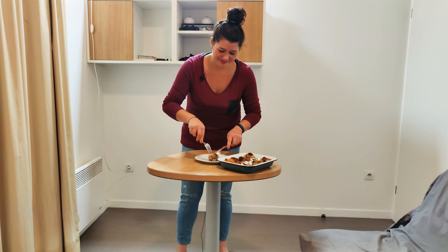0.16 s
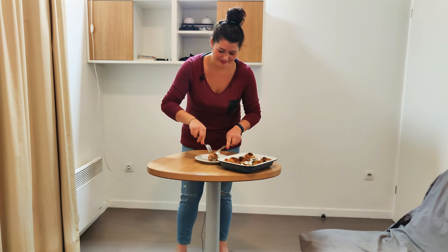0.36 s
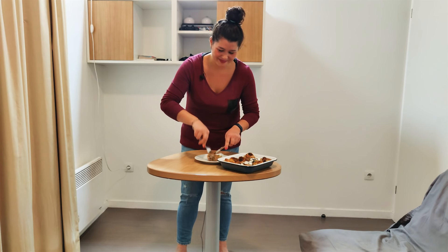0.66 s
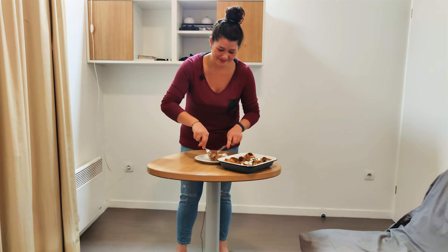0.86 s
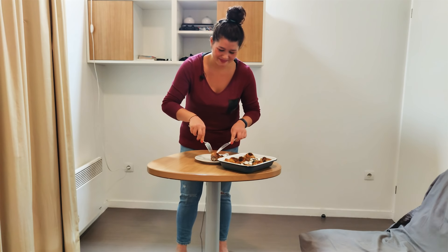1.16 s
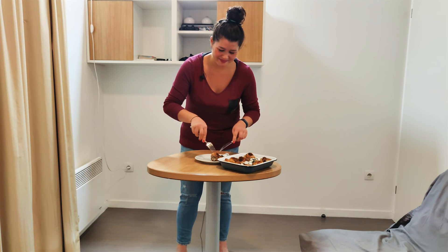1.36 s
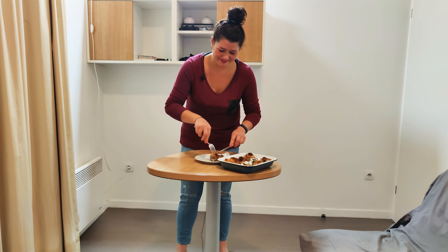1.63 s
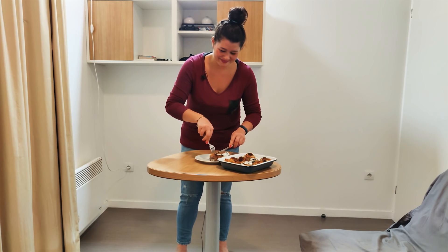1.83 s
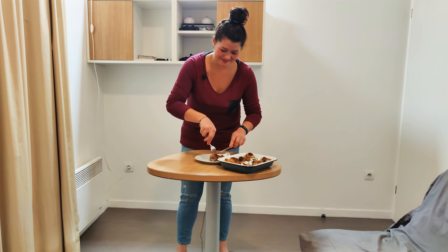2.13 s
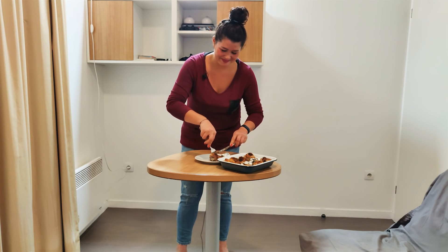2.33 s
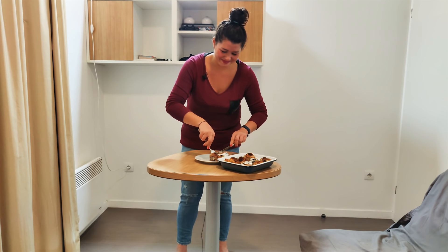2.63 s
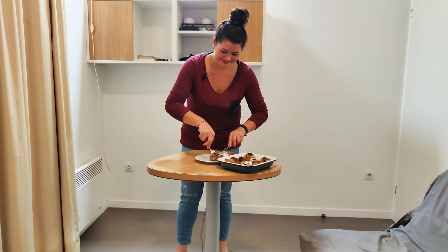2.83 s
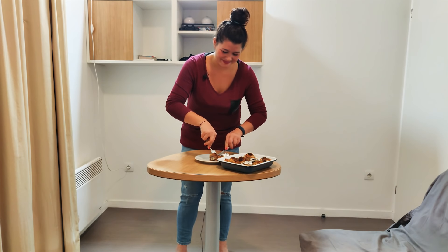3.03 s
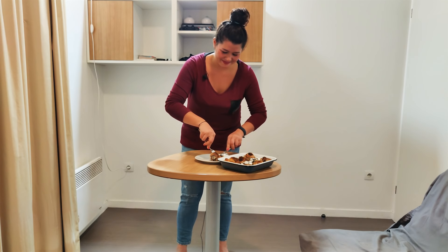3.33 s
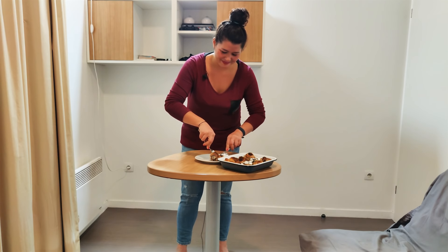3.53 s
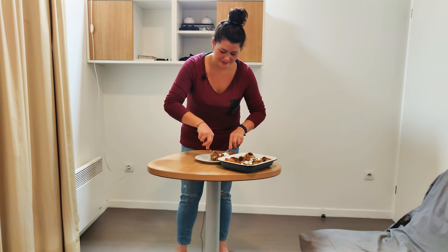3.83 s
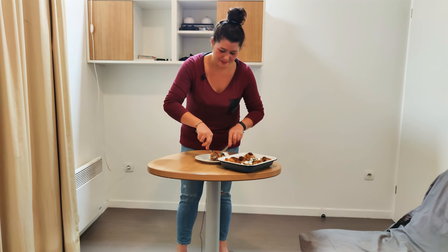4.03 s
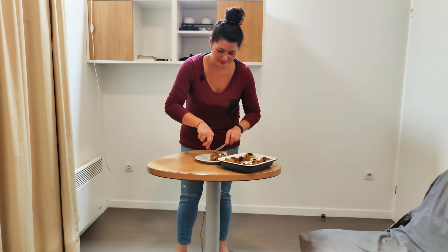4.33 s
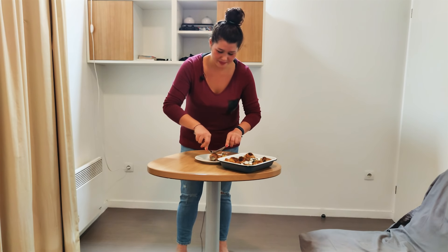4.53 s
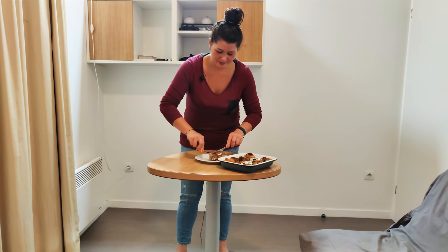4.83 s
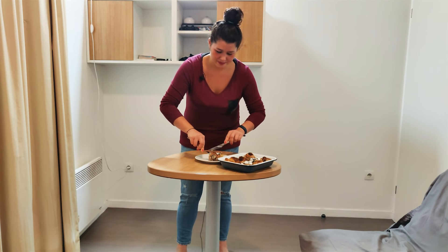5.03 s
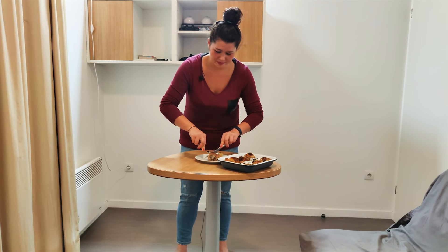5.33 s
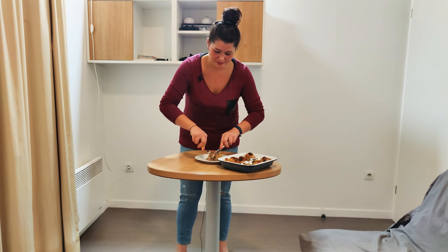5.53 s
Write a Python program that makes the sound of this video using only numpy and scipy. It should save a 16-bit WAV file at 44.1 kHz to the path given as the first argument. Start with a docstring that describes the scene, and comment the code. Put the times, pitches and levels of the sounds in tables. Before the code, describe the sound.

One sharp fork clink on a plate opens the scene, steel and ceramic ringing together and fading. After a pause, meat is cut in irregular strokes: light tearing crackle, thin blade squeaks, rasps on glaze, and damped knocks on the pressed plate, strongest mid-way and near the end. The microphone picks up a hard-walled small room, subtle table reflection, low rumble and faint air noise.

```python
"""A fork clinks hard on a ceramic plate and both ring, in a small, bare room with a low rumble.
Then cooked meat is cut on that plate, on a wooden table: the knife taps, saws through crackling meat,
knocks on the pressed plate and judders over its glaze. Steel and plate ring as damped resonances; slips and
tearing fibres are coloured impulses. Walls and table top answer plate and cutlery; small ticks stay dry."""
import sys
import numpy as np
from scipy import signal
from scipy.fft import rfft, irfft
from scipy.io import wavfile
from scipy.ndimage import uniform_filter1d

SR = 44100
rng = np.random.default_rng(int(sys.argv[2]) if len(sys.argv) > 2 else 0)


def store_pcm(level_fs):
    """Save levels as 16-bit WAV."""
    pcm = np.round(np.clip(level_fs, -1, 1) * 32767).astype(np.int16)
    wavfile.write(sys.argv[1], SR, np.atleast_2d(pcm).T)


N = 250929
TIME = np.arange(N) / SR

# Colour of the room air. Each row: frequency in Hz, relative level in dB per Hz.
AIR_COLOUR = [(15, 0), (30, -2), (55, -6), (85, -23), (200, -20), (430, -29), (850, -32), (1700, -36),
              (4400, -41), (6800, -40), (9200, -30), (12000, -40), (16000, -45)]
# Decay of the bare room. Each row: frequency in Hz, t60 in seconds.
ROOM_DECAY = [(125, 0.45), (500, 0.52), (2500, 0.47), (8000, .5), (15000, 0.22)]
# Small dry ticks close by. Each row: start in seconds, peak in dB.
CLOSE_TICKS = [(0.875, -35.5), (0.882, -26.5), (1.7684, -23.5), (2.8148, -17.5)]
# Thin squeaks of the sliding blade, one curve each. Each row of a curve: time in seconds, pitch in Hz, level in dB.
SQUEAK_CURVES = [
    [(2.32, 5630, -76), (2.398, 6400, -65), (2.45, 6300, -67), (2.502, 6600, -64), (2.576, 6900, -67),
     (2.64, 7220, -67)],
    [(2.72, 6330, -73), (2.765, 6400, -69), (2.82, 6100, -72)],
]
# The edge catches and rasps on the glaze.
# Each row: start in seconds, length in seconds, pitch in Hz, width in Hz, level in dB.
EDGE_RASPS = [(0.384, 0.036, 9100, 2510, -38), (0.625, 0.039, 8500, 1840, -37.5),
              (0.663, 0.02, 2970, 3000, -38), (0.687, 0.022, 9500, 600, -40),
              (0.763, 0.029, 4050, 1800, -51), (0.871, 0.023, 3320, 1500, -52.5),
              (2.037, 0.031, 9450, 1800, -49), (3.168, 0.026, 6200, 450, -51),
              (3.202, 0.02, 6250, 500, -35.5), (3.239, 0.049, 760, 67.5, -29.5),
              (3.632, 0.018, 4440, 900, -58), (3.683, 0.061, 3060, 350, -58), (3.703, 0.02, 2300, 300, -44),
              (4.397, 0.071, 2290, 380, -45.5), (4.445, 0.018, 5500, 250, -53),
              (4.547, 0.082, 3600, 700, -51), (4.55, 0.088, 9560, 1150, -42.5),
              (4.833, 0.04, 4900, 970, -58.5), (4.868, 0.062, 4720, 895, -54),
              (5.002, 0.045, 2210, 690, -38), (5.244, 0.055, 1080, 300, -50.5)]
# The loudest snaps of fibre and crust under the blade.
# Each row: start in seconds, peak in dB, treble tilt in dB per octave.
CRUST_SNAPS = [(0.7773, -25.5, -1), (1.6468, -34, 14), (1.761, -35.5, 1), (1.893, -33, 0), (1.935, -35, 11),
               (1.9753, -32.5, 7), (2.0376, -22.5, 3.5), (2.07, -32, 5), (2.617, -26, 6),
               (3.37, -16.5, -2.5), (3.396, -23, -3), (3.616, -30, 7), (3.6621, -24.5, -1),
               (3.9738, -27.5, -3.5), (4.1914, -24, 1), (4.55, -32, 11), (4.5995, -22.5, 18),
               (4.6607, -29.5, 2.5), (4.9567, -33, 0.5), (5.354, -29, 2), (5.66, -38.5, 10.5)]
# The point of the blade skips on the glaze. Each row: start in seconds, peak in dB.
POINT_SKIPS = [(4.339, -30.5), (4.3919, -25), (4.398, -19), (4.4022, -23), (4.415, -26), (4.8365, -41),
               (4.852, -38)]
# Colour of tearing meat. Each row: frequency in Hz, relative level in dB per Hz.
MEAT_COLOUR = [(200, -9.5), (1400, -12.5), (2600, -13), (4500, -12.5), (6500, -18), (8500, -7),
               (9600, -7.5), (11500, -13.5), (15500, -27.5)]
# Colour of steel grinding on glaze. Each row: frequency in Hz, relative level in dB per Hz.
GLAZE_COLOUR = [(250, -8.5), (700, -6), (1300, -6.5), (2300, -3.5), (3100, -7), (4600, 4.5), (5600, -6),
                (6700, -16), (9500, -2), (15000, -17.5)]
# Strokes of the cutlery through meat and over glaze. Each row: start in seconds, length in seconds,
# plate body in dB, plate edge in dB, meat crackle in dB, swell from start to end in dB.
CUTLERY_STROKES = [ (0.374, 0.015, -40.5, -47.5, -59.5, 11), (1.596, 0.055, -73, -80, -64.5, -6.5),
                   (1.925, 0.13, -70.5, -66, -55.5, 2), (2.3, 0.21, -65.5, -79.5, -70.5, -3),
                   (2.521, 0.18, -61, -75, -58.5, -5), (2.66, 0.053, -53.5, -59, -57.5, -5),
                   (2.817, 0.23, -65, -67, -59, -2), (2.989, 0.066, -55, -60, -49, -2),
                   (3.026, 0.05, -34, -60, -51, 3), (3.175, 0.055, -38.5, -41.5, -41, 11),
                   (3.241, 0.051, -48.5, -42, -39.5, 18), (3.322, 0.025, -66, -70, -45.5, -10),
                   (3.495, 0.062, -52, -54.5, -50.5, -4.5), (3.622, 0.11, -77, -60, -50, -7),
                   (3.706, 0.04, -81, -55.5, -49.5, -7.5), (3.971, 0.21, -63, -58, -50.5, -3),
                   (4.188, 0.11, -69, -68, -55, -11), (4.375, 0.09, -51.5, -64, -57.5, 3),
                   (4.536, 0.061, -77, -58, -47, 3.5), (4.825, 0.076, -67, -62, -60.5, 19.5),
                   (4.993, 0.039, -38.5, -43, -40.5, 1.5), (5.223, 0.14, -45.5, -52, -59, -2.5),
                   (5.624, 0.026, -65.5, -67.5, -71, -3.5), ]
# Blade knocks on the pressed plate. Each row: start in seconds, level in dB, treble tilt in dB per octave.
BLADE_KNOCKS = [(2.072, -11.5, -15.5), (2.1826, -20, -5), (2.78, -23, -1.5), (3.0233, 5, -3),
                (3.201, -15, 2), (3.2358, -3, 7), (3.2433, -10.5, -3), (3.2679, -21, 6), (3.283, -15, 4),
                (3.309, -14, -2), (3.714, -10, 10), (3.9237, -26, -12), (3.9823, -15, -6),
                (4.29, -28, -0.5), (4.3722, -22, -1), (4.416, -18, 2), (4.9923, -3, -2.5),
                (4.9979, -5.5, -6.5), (5.016, -7.5, -9), (5.03, -19, -1), (5.042, -10.5, -9.5),
                (5.069, -20, -4), (5.2301, -14.5, -4), (5.254, -15, -6.5), (5.267, -17, -1.5),
                (5.308, -30, 8), (5.3293, -14.5, -4.5), (5.351, -21, 0), (5.372, -25, -5)]
# Resonances of the plate held down by the blade, with one low resonance of the room at 122 Hz. # Each row:
# frequency in Hz, width in Hz, relative level in dB.
PRESSED_MODES = [(122, 15, -9.5), (380, 150, -4.5), (499, 50, -0.5), (600, 53, 0), (1060, 220, -11.5),
                 (1196, 45, -12), (2370, 200, -0.5), (2630, 420, 1), (4840, 540, -8.5), (9100, 185, -3),
                 (9500, 1100, -0.5), (11300, 850, -14)]
# Three more resonances shift with the place where the blade presses.
# Each row: time in seconds, body in Hz, edge in Hz, upper edge in Hz.
CONTACT_PITCHES = [(2.1, 637, 3980, 5800), (3.02, 793, 4010, 5600), (3.279, 768, 4330, 5920),
                   (3.981, 663, 4040, 5400), (4.399, 600, 3970, 5060), (5.0, 658, 3920, 6000),
                   (5.23, 713, 3710, 5600), (5.397, 724, 3550, 5400)]
# Shapes of these three, in the same order. Each row: width in Hz, relative level in dB.
CONTACT_SHAPES = [(90, 0), (300, -3), (380, -3)]
# Free ring of the plate; close pairs beat.
# Each row: frequency in Hz, relative level in dB, t60 at full sustain in seconds.
PLATE_RING = [(366, -15.5, 2.15), (538, -9, .53), (577, -10, 1.0), (582, -8.5, 1.3), (607, -18, 1.6),
              (732, -13, .43), (851, -2.5, .75), (880, -6, .42), (1137, -4, .35), (1170, -.5, .73),
              (1175, -10, .7), (1545, -21, 1.05), (1653, -19.5, 1.1), (1685, -11, .5)]
# Free ring of the fork. Each row: frequency in Hz, relative level in dB, t60 at full sustain in seconds.
FORK_RING = [(2345, -7, .42), (2492, -11, .48), (4021, -21, .6), (4661, -9, .46), (4670, -13, .42),
             (5338, -14, .5), (5599, -17, .48), (5660, -7, .48), (6316, -16, .45), (6681, -3, .45),
             (6728, -11, .42), (7978, -20, .58), (8535, -12.5, .48), (9545, -15, .42), (9969, -17, .42),
             (10607, -2, .35), (10653, -1, .35), (10741, -6, .38), (10875, -2.5, .42), (11810, -19, .42),
             (15177, -10, .24)]
# Free ring of the knife. Each row: frequency in Hz, relative level in dB, t60 at full sustain in seconds.
KNIFE_RING = [(652, -0.5, 0.16), (1870, -4.5, 0.059), (2300, -13, 0.15), (2500, -4, 0.059),
              (2790, 1.5, 0.09), (4270, -14, 0.13), (4900, -24, 0.38), (5820, -0.5, 0.08),
              (7350, -10.5, 0.32), (8850, -8, 0.49), (9050, 13, 0.038), (10600, -14, 0.29),
              (10900, -1, 0.068), (11530, -12, 0.34), (13400, -22, 0.25)]
# Short-lived resonances of fork and plate while they clash.
# Each row: frequency in Hz, width in Hz, relative level in dB.
CLASH_MODES = [(380, 60, -4), (533, 190, -2), (720, 86, -6.5), (905, 150, -6.5), (1150, 54, -10),
               (1295, 100, -10), (1720, 57, -18.5), (2300, 140, -10), (2455, 170, -6.5), (2820, 98, -14),
               (3960, 240, -12), (5070, 81, -18), (5612, 130, -7), (6250, 170, -10.5), (6600, 72, -6),
               (7734, 260, -16.5), (7830, 66, -18), (8310, 150, -14.5), (9870, 110, -15), (10100, 180, -17),
               (10520, 120, -0.5), (11900, 97, -19), (11200, 140, -24.5), (13300, 100, -22.5)]
# The knife taps. Each row: start in seconds, ring in dB, crack in dB.
KNIFE_TAPS = [(2.184, -38.5, -12)]
# The fork lands, bounces or nudges the plate. Each row: start in seconds, plate ring in dB, fork ring in dB,
# crack in dB, treble tilt in dB per octave, sustain from 0 to 1.
FORK_CLINKS = [(0.4184, -19, -15.5, 22.5, 0, 1), (0.476, -36, -32, 7, -1, .5),
               (2.0725, -75, -37, -32, -10, .3)]

# a stroke bites quickly, holds while the hand leans in or eases off, then lets go
STROKE_ATTACK_S, STROKE_RELEASE_S = 0.0033, 0.023
# the blade sticks and slips: slips per second at each spot, their spread in size, the depth of their bursts
SLIPS_PER_S, SLIP_SPREAD_DB, BURST_DB = 100, 4, 5.5
# broad grit of a scrape, against the plate's bright edge
GRIT_DB = -9
# stray fibres: ticks per second in each bundle, and their level
STRAY_PER_S, STRAY_DB = 14, -72
# the squeak's upper partial, against the main note
SQUEAK_RATIO, SQUEAK_UPPER_DB = 1.51, -2
# a softer or harder knock changes the pressed plate's colour only above this pitch
TILT_FROM_HZ = 220
# the plate's resonances divide into a low body and a bright edge
BODY_TOP_HZ, EDGE_TOP_HZ = 1800, 7000
# the clash is thinned below this pitch
CLASH_LOW_CUT_HZ = 290
# the recorder's upper limit
TOP_HZ = 16000


def undb(db):
    """Decibels to gain."""
    return 10 ** (np.asarray(db) / 20)


def unit(x):
    """Scale to rms 1."""
    return x / np.sqrt(np.mean(x ** 2))


def on_log_axis(points, hz):
    """Read (Hz, value) points along straight lines in log frequency."""
    f, value = np.transpose(points)
    return np.interp(np.log(np.maximum(hz, 1)), np.log(f), value)


def convolve(x, response):
    """Pass a sound through an impulse response."""
    return signal.fftconvolve(x, response)[:len(x)]


def add(track, s, sound):
    """Mix a sound into a track at time s."""
    start = int(s * SR)
    track[start:start + len(sound)] += sound[:N - start]


def wander(length, count):
    """A random curve of straight lines through count levels, spread near 1."""
    levels = rng.standard_normal(count)
    return np.interp(np.linspace(0, count - 1, length), np.arange(count), levels)


def tilted(rows, tilt_db):
    """Brighten or dull (Hz, dB, ..) rows by so many dB per octave about 2 kHz."""
    return [(hz, db + tilt_db * np.log2(hz / 2000), *rest) for hz, db, *rest in rows]


def click(colour, patchy_db=0, size=1024):
    """Causal click of unit energy with the given spectrum and chance peaks of its own."""
    hz = np.fft.rfftfreq(size, 1 / SR)
    spectrum_db = on_log_axis(colour, hz) + patchy_db * wander(len(hz), count=56)
    # folding the cepstrum gives minimum phase: the energy comes at once
    cepstrum = irfft(np.log(undb(spectrum_db)))
    cepstrum[1:size // 2] *= 2
    cepstrum[size // 2 + 1:] = 0
    return unit(irfft(np.exp(rfft(cepstrum)))) / np.sqrt(size)


def resonate(modes):
    """Impulse response of damped (Hz, width, dB) resonances, unit energy."""
    t, out = TIME[:SR // 5], 0
    for hz, width, db in modes:
        decay = np.exp(-np.pi * width * t)
        out = out + undb(db) * width * decay * np.cos(2 * np.pi * hz * t)
    return out / np.linalg.norm(out)


def ring(modes, sustain=1):
    """Decaying modes that each waver a little; a firmer grip gives less sustain."""
    t, out = TIME[:2 * SR], 0
    for hz, db, t60 in modes:
        level_db = db - 60 * t / (t60 * sustain) + 2 * wander(len(t), count=44)
        out = out + undb(level_db) * np.sin(2 * np.pi * (hz * t + rng.random()))
    return out


def chatter(response, decay_s):
    """A contact that breaks into many tiny ones within milliseconds; unit energy."""
    t = TIME[:len(response)]
    contacts = rng.standard_normal(len(t)) * np.exp(-t / decay_s)
    burst = convolve(contacts, response)
    return burst / np.linalg.norm(burst)


def slips(rate, spread_db, size=N):
    """Irregular tiny impulses of uneven strength, rms 1."""
    strength = undb(spread_db * np.minimum(rng.exponential(size=size), 4))
    occurs = rng.random(size) < rate / SR
    return unit(occurs * strength * rng.choice([-1, 1], size))


def pressure(length, swell_db):
    """Gain of one stroke: attack, a hold that swells or eases, release."""
    t = TIME[:int((length + .2) * SR)]
    hold = undb(swell_db * (np.minimum(t / length, 1) - .5))
    attack = np.minimum(t / STROKE_ATTACK_S, 1)
    release = np.exp(-np.maximum(t - length, 0) / STROKE_RELEASE_S)
    return hold * attack * release


def pressed_plate(s, tilt_db=0, lo_hz=0, hi_hz=SR):
    """Unit-energy response of the plate pressed at time s; each contact reweights and detunes it a little."""
    t, out = TIME[:SR // 5], 0
    times, *pitches = np.transpose(CONTACT_PITCHES)
    shifted = [(np.interp(s, times, hz), width, db) for hz, (width, db) in zip(pitches, CONTACT_SHAPES)]
    modes = PRESSED_MODES + shifted
    spots = rng.standard_normal((len(modes), 2)) * (2, .02)  # dB, fraction of pitch
    for (hz, width, db), (spot_db, detune) in zip(modes, spots):
        if lo_hz < hz < hi_hz:
            age = 1.5 * np.pi * width * t
            # the ring swells briefly as the blow spreads over the plate, which keeps the resonances distinct
            envelope = width * age * np.exp(-age)
            level = undb(db + spot_db + tilt_db * np.log2(max(hz, TILT_FROM_HZ)))
            out = out + level * envelope * np.sin(2 * np.pi * hz * (1 + detune) * t)
    return out / np.linalg.norm(out)


def ambient():
    """Steady room air with a deep rumble, a faint wavering hum and a slow pressure drift below hearing."""
    air = unit(convolve(rng.standard_normal(N), click(AIR_COLOUR, size=16384)))
    rumble = rng.standard_normal(N)
    for _ in range(2):  # twice through one resonance, for steeper skirts
        rumble = convolve(rumble, resonate([(45, 12, 0)]))
    hum = np.sin(2 * np.pi * 123 * TIME) * wander(N, count=40)
    drift = uniform_filter1d(wander(N, count=60), size=2000)
    return undb(-57.5) * air + undb(-55.5) * unit(rumble) + undb(-63.0) * hum + undb(-42) * drift


def room(x, wet_db, build_s, table_db, table_s):
    """A bounce off the table top, and a diffuse tail that builds up and decays at its own rate in each band."""
    t, hz = TIME[:SR], np.fft.rfftfreq(SR, 1 / SR)
    noise, tail = rfft(rng.standard_normal(SR)), 0
    for k, (_, t60) in enumerate(ROOM_DECAY):
        # neighbouring bands crossfade
        share = on_log_axis([(f, j == k) for j, (f, _) in enumerate(ROOM_DECAY)], hz)
        tail = tail + irfft(noise * share, SR) * np.exp(-np.log(1000) * t / t60)
    tail *= 1 - np.exp(-t / build_s)
    response = undb(wet_db) * tail / np.linalg.norm(tail)
    response[int(table_s * SR)] += undb(table_db)
    return convolve(x, response)


def ticks(hz=8400, length_s=0.00089):
    """Tiny close ticks, a few cycles each."""
    out, t = np.zeros(N), TIME[:int(length_s * SR)]
    for s, db in CLOSE_TICKS:
        add(out, s, undb(db) * np.hanning(len(t)) * np.sin(2 * np.pi * hz * t))
    return out


def squeaks(waver=0.00088):
    """The blade slides lightly and sings a thin, gliding note with one upper partial."""
    out = np.zeros(N)
    for curve in SQUEAK_CURVES:
        s, hz, db = np.transpose(curve)
        t = np.arange(s[0], s[-1], 1 / SR)
        pitch = np.interp(t, s, hz) * (1 + waver * wander(len(t), count=40))
        phase = 2 * np.pi * np.cumsum(pitch) / SR
        note = np.sin(phase) + undb(SQUEAK_UPPER_DB) * np.sin(SQUEAK_RATIO * phase)
        fades = signal.windows.tukey(len(t), .2)
        add(out, s[0], undb(np.interp(t, s, db)) * fades * note)
    return out


def rasps():
    """Fast slips ring one resonance of the blade."""
    out, t = np.zeros(N), TIME[:SR // 50]
    for s, length, hz, width, db in EDGE_RASPS:
        blade = t * np.exp(-1.5 * np.pi * width * t) * np.sin(2 * np.pi * hz * t)
        swell = signal.windows.tukey(int(length * SR))
        grit = slips(rate=1500, spread_db=3, size=SR)[:len(swell)]
        add(out, s, undb(db) * swell * unit(convolve(grit, blade)))
    return out


def snaps():
    """Single snaps of crust and skips of the blade's point: clicks blurred by contacts that die within a few ms."""
    out = np.zeros(N)
    events = [(s, db, tilted(MEAT_COLOUR, tilt_db)) for s, db, tilt_db in CRUST_SNAPS]
    events += [(s, db, GLAZE_COLOUR) for s, db in POINT_SKIPS]
    for s, db, colour in events:
        snap = chatter(click(colour), decay_s=.0007)
        add(out, s, undb(db) * snap / np.abs(snap).max())
    return out


def meat(count=4):
    """Moist fibres tear in small bundles, each with its own colour and spurts; stray ones tick throughout."""
    effort, out = np.zeros(N), 0
    for s, length, _, _, db, swell_db in CUTLERY_STROKES:
        add(effort, s, undb(db) * pressure(length, swell_db))
    for _ in range(count):
        spurts = undb(6 * wander(N, count=380))
        torn = effort * spurts * slips(rate=300, spread_db=3.0)
        stray = undb(STRAY_DB) * slips(STRAY_PER_S, spread_db=-2)
        out = out + convolve(torn + stray, click(MEAT_COLOUR, patchy_db=6))
    return out / np.sqrt(count)


def scraping(count=2):
    """Bursts of slips at a few spots along the blade shake the plate's body and edge and grind the glaze."""
    out = np.zeros(N)
    for s, length, body_db, edge_db, _, swell_db in CUTLERY_STROKES:
        gain = pressure(length, swell_db)
        for _ in range(count):
            bursts = slips(SLIPS_PER_S, SLIP_SPREAD_DB, size=SR) * undb(BURST_DB * wander(SR, count=75))
            judder = gain * bursts[:len(gain)]
            # chance slips must not change the energy of the stroke
            judder *= np.linalg.norm(gain) / np.linalg.norm(judder)
            body = undb(body_db) * pressed_plate(s, hi_hz=BODY_TOP_HZ)
            edge = undb(edge_db) * pressed_plate(s, lo_hz=BODY_TOP_HZ, hi_hz=EDGE_TOP_HZ)
            grit = undb(edge_db + GRIT_DB) * click(GLAZE_COLOUR, patchy_db=5)
            add(out, s, convolve(judder, body + edge) + convolve(judder, grit))
    return out / np.sqrt(count)


def knocks():
    """The blade breaks through and strikes the plate, which the hands damp."""
    out = np.zeros(N)
    for s, db, tilt_db in BLADE_KNOCKS:
        add(out, s, undb(db) * pressed_plate(s, tilt_db))
    return out


def free_rings():
    """Plate and cutlery ring on after a loose hit."""
    out = np.zeros(N)
    for s, plate_db, fork_db, _, tilt_db, sustain in FORK_CLINKS:
        for modes, db in (PLATE_RING, plate_db), (FORK_RING, fork_db):
            add(out, s, undb(db) * ring(tilted(modes, tilt_db), min(sustain, 1)))
    for s, ring_db, _ in KNIFE_TAPS:
        add(out, s, undb(ring_db) * ring(KNIFE_RING, sustain=0.76))
    return out


def clinks():
    """The hit itself, by fork or knife: steel chatters on glaze and drives the resonances hard."""
    out = np.zeros(N)
    low_cut = signal.butter(2, CLASH_LOW_CUT_HZ, "high", fs=SR, output="sos")
    for s, _, _, crack_db, tilt_db, _ in FORK_CLINKS:
        modes = [(hz, width, db + tilt_db * np.log2(hz)) for hz, width, db in CLASH_MODES]
        thinned = signal.sosfilt(low_cut, resonate(modes))
        add(out, s, undb(crack_db) * chatter(thinned, decay_s=0.0032))
    for s, _, crack_db in KNIFE_TAPS:
        struck_knife = resonate([(hz, 380, db) for hz, db, _ in KNIFE_RING])
        add(out, s, undb(crack_db) * chatter(struck_knife, decay_s=0.00074))
    return out


def scene():
    """The wide plate fills the room; small sounds at the blade stay drier."""
    plate = clinks() + knocks() + scraping()
    rings = free_rings()
    cutting = meat() + snaps() + rasps() + squeaks()
    into_room = plate + undb(-20.5) * rings + undb(-3.0) * cutting
    walls = room(into_room, wet_db=-4.0, build_s=0.013, table_db=-12.5, table_s=0.002)
    return (plate + rings + cutting + walls + ticks() + ambient())[None]


def record(dry):
    """The recorder rounds the loudest peaks and cuts the top."""
    rounded = .61 * np.tanh(dry / .61)
    return signal.sosfilt(signal.ellip(8, .2, 70, TOP_HZ, fs=SR, output="sos"), rounded)


dry = scene()
out = record(dry)
store_pcm(out)
```